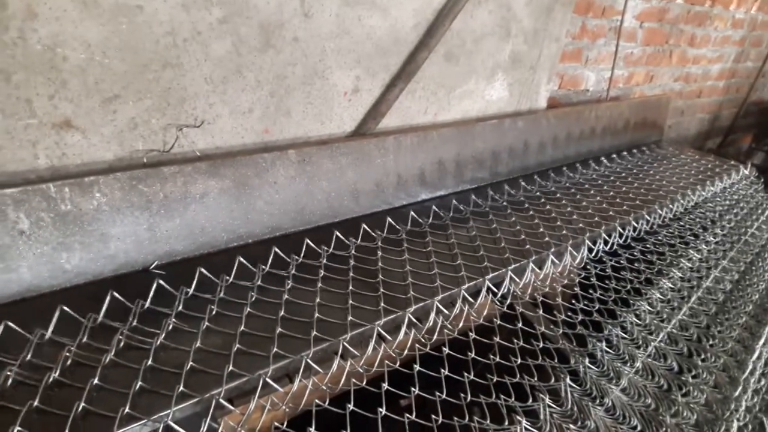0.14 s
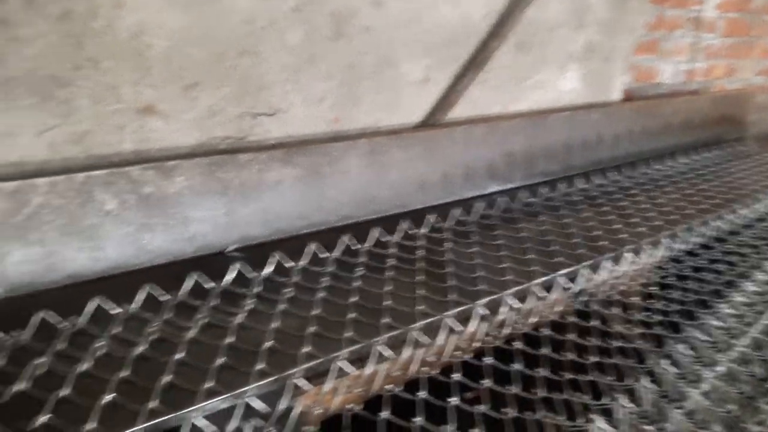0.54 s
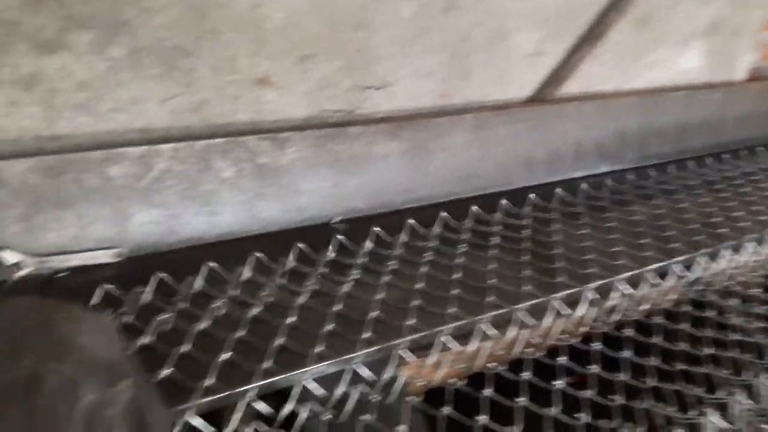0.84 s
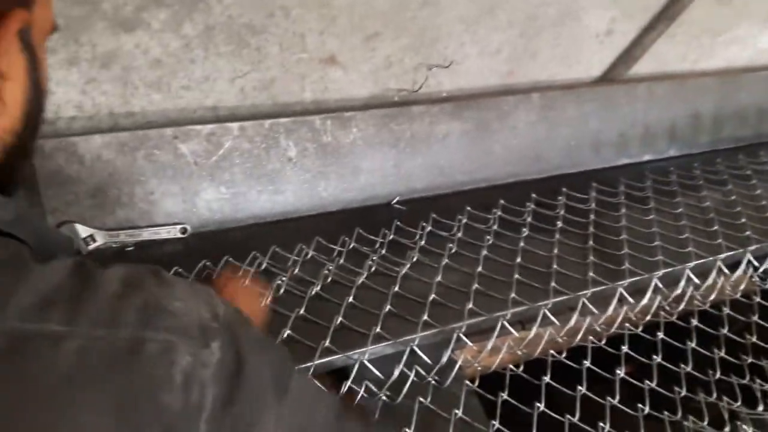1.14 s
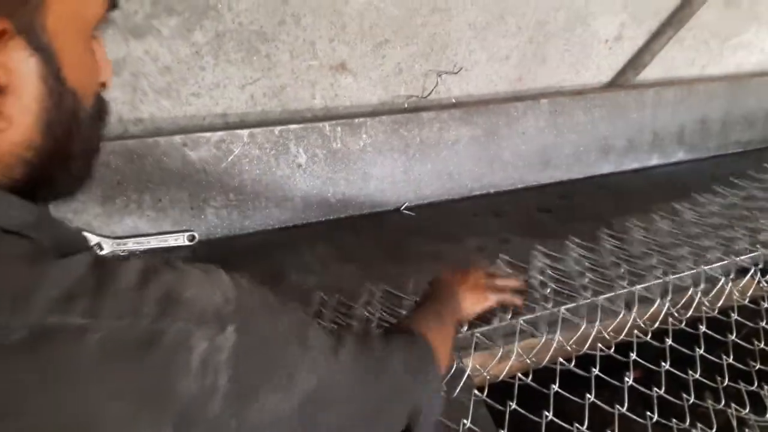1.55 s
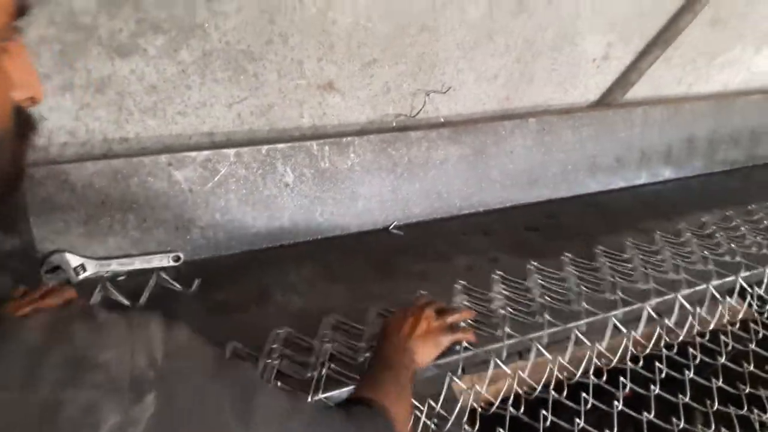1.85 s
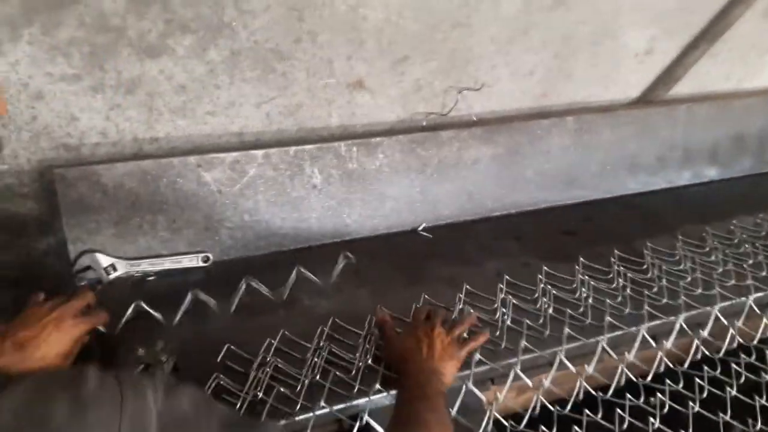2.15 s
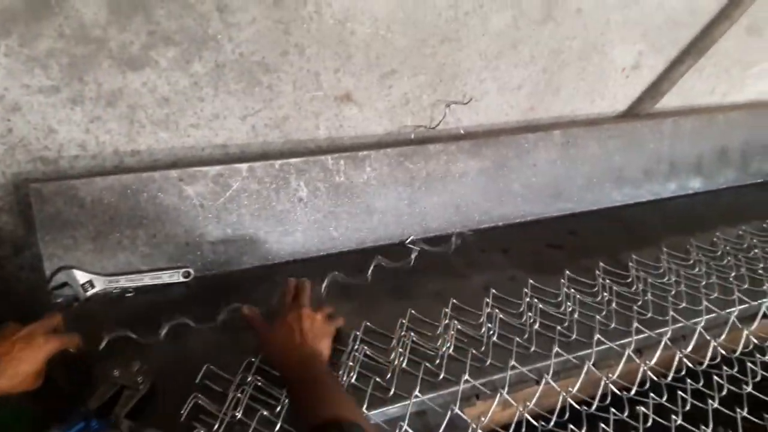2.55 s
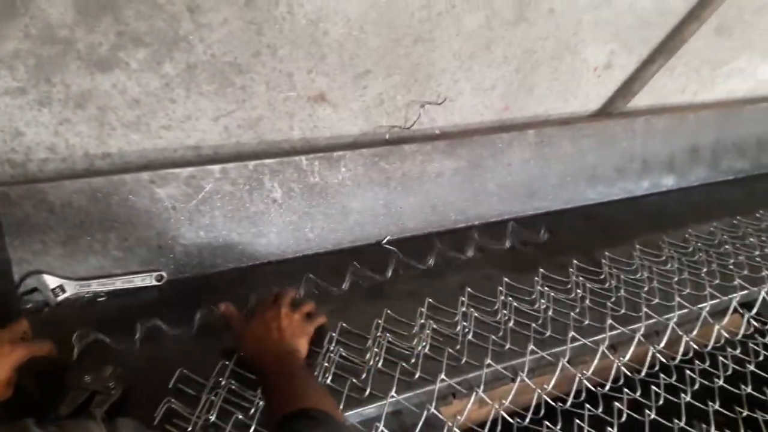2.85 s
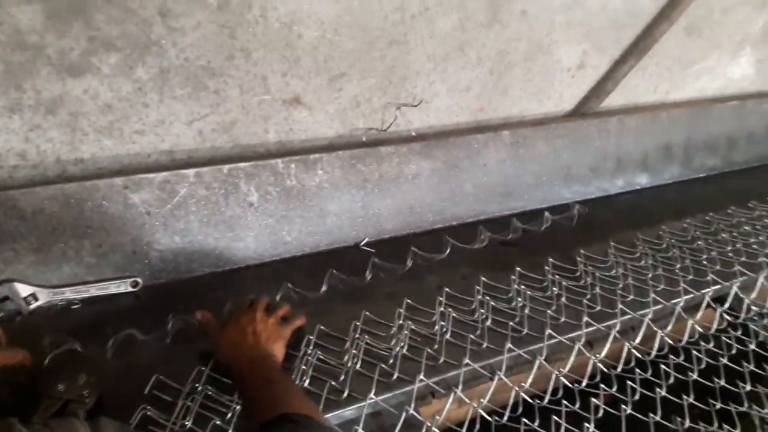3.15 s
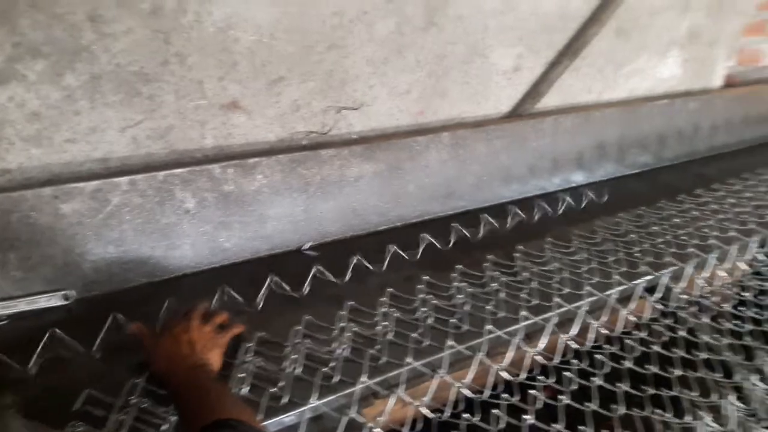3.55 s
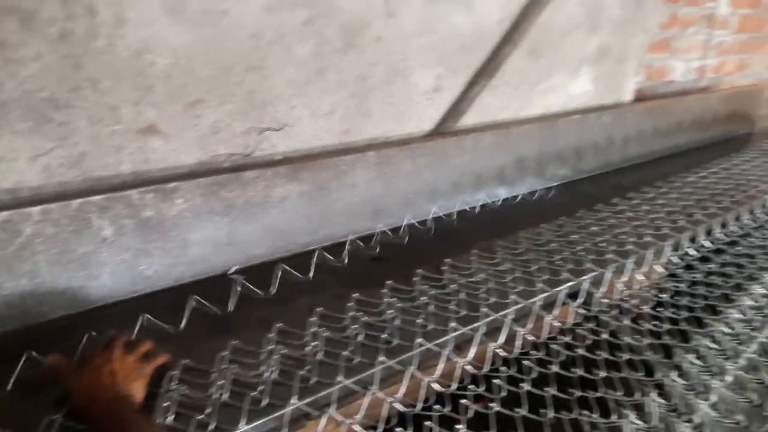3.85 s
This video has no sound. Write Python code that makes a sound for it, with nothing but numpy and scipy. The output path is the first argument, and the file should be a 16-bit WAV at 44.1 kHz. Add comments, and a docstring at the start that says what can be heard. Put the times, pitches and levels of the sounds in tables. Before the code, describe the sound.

Chain-link weaving machine winds down, quiet clinks and dragged mesh, then harsh rapid rattling pulses build

```python
"""Wire-weaving machine

A wire-weaving machine in a hard-walled workshop, close to the microphone: it runs down, a hand jolts and drags
the mesh, then it starts again. The turning wire spiral slaps a sheet-metal trough, each slap a shower of tiny ticks;
links rattle in between, a steel part clinks once, decaying noise bands make knocks and one bright ping, and filtered
noise rumbles as the drive. Ticks ring trough and wire; the microphone rings near 8 kHz and overloads."""
import sys
import numpy as np
from scipy import signal
from scipy.fft import rfft, irfft
from scipy.io import wavfile
from scipy.ndimage import uniform_filter1d

SR = 44100
rng = np.random.default_rng(int(sys.argv[2]) if len(sys.argv) > 2 else 0)


def unload_audio(sound):
    """Save the sound as a 16-bit wav file, at the path given as the first command line argument."""
    columns = np.transpose(np.atleast_2d(sound))
    # keep every value between -1 and 1, then stretch to whole-number steps
    steps = np.round(np.clip(columns, -1, 1) * 32767)
    wavfile.write(sys.argv[1], SR, steps.astype(np.int16))


N = 176400
T = np.arange(N) / SR

# ticks of slaps and clink: mean rate, scale of the exponential spread
TICKS_PER_S, TICK_SPREAD_DB = 12000, 3.5


def undb(db):
    """Decibels to amplitude ratio."""
    return 10 ** (np.asarray(db) / 20)


def unit(x):
    """Scale to an RMS of 1."""
    return x / np.sqrt(np.mean(x ** 2))


def colour(x, table, size=8192):
    """Minimum-phase filter through (Hz, dB) points; keeps the power of white input."""
    hz, db = np.array(table).T
    bin_hz = np.maximum(np.arange(size // 2 + 1), 1) * SR / size
    log_gain = np.interp(np.log(bin_hz), np.log(hz), db) * np.log(10) / 20
    # fold the cepstrum onto positive time to make the filter causal
    cepstrum = irfft(log_gain)
    cepstrum[1:size // 2] *= 2
    cepstrum[size // 2 + 1:] = 0
    impulse = irfft(np.exp(rfft(cepstrum)))
    return signal.fftconvolve(x, impulse / np.sqrt(np.sum(impulse ** 2)))[:N]


def butter(x, hz, kind, order=2):
    """Butterworth filter."""
    return signal.sosfilt(signal.butter(order, hz, kind, fs=SR, output="sos"), x)


def noise_band(low_hz, high_hz, order=2):
    """Band of white noise, RMS 1."""
    return unit(butter(rng.standard_normal(N), [low_hz, high_hz], "band", order))


def walk(rate_hz):
    """Slewed random levels, one new target every 1 / rate_hz seconds; RMS 1."""
    hold = int(SR / rate_hz)
    steps = np.repeat(rng.standard_normal(N // hold + 1), hold)
    return unit(uniform_filter1d(steps, hold)[:N])


def ticks(per_s, spread_db):
    """Random one-sample ticks of either sign, a few much larger than the rest; RMS 1."""
    when, sign, size = rng.random((3, N))
    level_db = -spread_db * np.log(size + 3e-3)
    return unit((when < per_s / SR) * np.sign(sign - .5) * undb(level_db))


def ring(x, modes, swell_db=0):
    """Decaying modes (Hz, dB, t60 s) driven by x, each with its own changing strength."""
    swells_per_s = 30
    t = T[:SR // 2]
    out = np.zeros(N)
    for hz, db, t60_s in modes:
        drive = x * unit(undb(swell_db * walk(swells_per_s)))
        mode = undb(db) * np.cos(2 * np.pi * hz * t) * 1000. ** (-t / t60_s)
        out += signal.fftconvolve(drive, mode)[:N]
    return out


def control(column):
    """Gain over time from one dB column of the machine table."""
    # Machine and moving mesh. Each row: time in seconds, rattle of links in dB,
    # brightness of the rattle in dB, low rumble of the drive in dB.
    machine = np.array([(0, -10, -6.5, -27.5), (.1, -15.5, -9, -28.5), (.25, -20.5, -4.5, -32.5),
                        (.45, -26, -15, -39), (.77, -39.5, -18, -42.5), (.8, -25, -3, -35),
                        (1.1, -28, -31, -40), (1.43, -30.5, -34, -34.5), (1.54, -12, -25, -27.5),
                        (1.8, -15, -38, -28.5), (1.95, -11, -21, -25.5), (2.2, -9, -19, -26),
                        (2.45, -12, -15, -24), (2.7, -14, -15, -28), (3.42, -13, -6.5, -28),
                        (4, -15.5, -6, -23.5)])
    return undb(np.interp(T, machine[:, 0], machine[:, column]))


def shop_noise():
    """Steady coloured noise of the workshop."""
    # Spectrum of the shop. Each row: frequency in Hz, gain in dB.
    shop_points = [(30, -22), (400, -10.5), (700, -9.5), (1300, -19.5), (7700, -23), (10000, -48),
                   (15500, -72)]
    level_db = -41.5
    return unit(colour(rng.standard_normal(N), shop_points)) * undb(level_db)


def drone():
    """Low resonances, as noise bands that fade in and out."""
    # Each row: frequency in Hz, level in dB, start in s, end in s; silent if the end is well before the start.
    drone_rows = [(207, -33, 0.19, 0.12), (358, -43, 0.12, 0.68), (680, -40.5, 0.15, 0.53),
                  (140, -38, 1.4, 2.6), (251, -31.5, 1.53, 2.48), (794, -31.5, 1.51, 2.4)]
    fade_s, q = 0.05, 9
    out = np.zeros(N)
    for hz, db, start, end in drone_rows:
        band = noise_band(hz * (1 - .5 / q), hz * (1 + .5 / q), order=1)
        gate = np.clip(np.minimum(T - start, end - T) / fade_s + .5, 0, 1)
        out += undb(db) * band * gate
    return out


def rumble():
    """Unsteady low noise of the drive through the frame, plus its droning resonances."""
    # Spectrum of the rumble. Each row: frequency in Hz, gain in dB.
    rumble_points = [(30, -19), (80, -13), (150, 0.5), (330, -5), (480, -5.5), (800, -7.5), (1500, -10.5),
                     (4000, -25)]
    flicker_db, flickers_per_s = 1.5, 11
    noise = unit(colour(rng.standard_normal(N), rumble_points))
    return noise * control(column=3) * undb(flicker_db * walk(flickers_per_s)) + drone()


def room(x):
    """Dense noise tail of a hard room; above the lowest band it dies sooner."""
    # Decay by band, low to high. Each row: upper edge in Hz, t60 in seconds.
    decay_rows = [(3000, 1.48), (10500, 0.54), (20000, 0.59)]
    level_db, gap_s = -9, .01
    t = T[:2 * SR]
    spectrum = rfft(rng.standard_normal(len(t)))
    hz = np.fft.rfftfreq(len(t), 1 / SR)
    tail = np.zeros(len(t))
    low_hz = 0
    for high_hz, t60_s in decay_rows:
        band = irfft(spectrum * (hz >= low_hz) * (hz < high_hz))
        tail += band * 1000. ** (-t / t60_s) * (t > gap_s)
        low_hz = high_hz
    return undb(level_db) * signal.fftconvolve(x, tail / np.sqrt(np.sum(tail ** 2)))[:N]


def knocks_and_ping():
    """Knocks and one bright ping: decaying bursts of one noise band each."""
    # Each row: start in seconds, level before the decay in dB, centre in Hz, width in octaves, t60 in seconds.
    burst_rows = [(0.79, -35, 420, 1.2, 0.33), (0.938, -17.5, 3830, 0.37, 0.025),
                  (1.1473, -26.5, 550, 2.07, 0.51), (1.281, -29.5, 318, 1.14, 0.63),
                  (3.859, -23.5, 154.4, 0.23, 0.88)]
    rise_s = .0006
    out = np.zeros(N)
    for start, db, hz, octaves, t60_s in burst_rows:
        t = np.maximum(T - start, 0)
        band = noise_band(hz * 2 ** (-.5 * octaves), hz * 2 ** (.5 * octaves))
        out += band * undb(db) * (1 - np.exp(-t / rise_s)) * 1000. ** (-t / t60_s)
    return out


def clink():
    """Steel on steel: a sharp contact and a brief chatter of ticks ring a loose part."""
    # Modes of the part. Each row: frequency in Hz, level in dB, t60 in seconds.
    clink_modes = [(1540, -37, 0.01), (3100, -32, 0.0029), (4230, -38, 0.0033), (5020, -48, .04)]
    start_s, chatter_fall_s = 1.2672, 0.031
    env = (T > start_s) * np.exp(-np.abs(T - start_s) / chatter_fall_s)
    return ring(ticks(TICKS_PER_S, TICK_SPREAD_DB) * env, clink_modes)


def rattle():
    """Links chatter against each other as the mesh moves; duller than slaps, dullest when dragged by hand."""
    per_s, spread_db, top_hz, bright_hz = 7000, 2.5, 10300, 5150
    flicker_db, flickers_per_s = 2, 60
    chatter = butter(ticks(per_s, spread_db), top_hz, "low")
    low = butter(chatter, bright_hz, "low")
    high = butter(chatter, bright_hz, "high")
    # minus sign: second-order halves are in antiphase at the crossover
    shaded = low - high * control(column=2)
    return shaded * control(column=1) * undb(flicker_db * walk(flickers_per_s))


def slaps():
    """Each slap: a first contact, then a shower of ticks in uneven bounces that thins out, body before treble."""
    # Slaps of wire on the trough and jolts of the mesh.
    # Each row: start in seconds, level in dB before the common gain, hold of the shower in seconds.
    slap_rows = [(0.017, 1.5, 0.073), (0.069, 0, 0.017), (0.147, -5, 0.022), (0.18, -5.5, 0.023),
                 (0.7864, -15, 0.014), (0.822, -15, 0.017), (0.8714, -16.5, 0.013), (0.923, -14.5, 0.02),
                 (1.041, -16, 0.043), (1.1476, -16.5, 0.039), (1.269, -21, 0.038), (1.448, -19.5, 0.015),
                 (1.471, -17.5, 0.042), (1.5264, -14, 0.02), (1.5716, -9, 0.033), (1.8203, -7.5, 0.026),
                 (1.931, -5, 0.0058), (1.9637, 2.5, 0.025), (2.089, 4.5, 0.024), (2.1392, -0.5, 0.022),
                 (2.1966, 2.5, 0.025), (2.23, 4.5, 0.012), (2.2618, 5.5, 0.018), (2.33, -3.5, 0.02),
                 (2.384, 0, 0.017), (2.4895, 0, 0.03), (2.6208, 5.5, 0.011), (2.739, 7, 0.013),
                 (2.792, -1.5, 0.039), (2.8543, 8, 0.028), (2.919, -5, 0.012), (2.9852, 9, 0.02),
                 (3.0486, -1, 0.0057), (3.104, 6, 0.0087), (3.1628, 6, 0.012), (3.2235, 8, 0.025),
                 (3.288, 4, 0.025), (3.342, -3, 0.011), (3.354, 10, 0.011), (3.399, -1, 0.049),
                 (3.4655, -2, 0.0088), (3.491, 7.5, 0.0081), (3.565, -6.5, 0.03), (3.611, 3, 0.03),
                 (3.666, 0, 0.022), (3.7323, 6, 0.016), (3.799, 1, 0.011), (3.849, 3.5, 0.036),
                 (3.913, 2, 0.026), (3.9823, 7.5, 0.017)]
    common_gain_db, rise_s, sag_db_per_s = -11.5, 0.00097, -220
    crack_db, crack_fall_s = 5, .004  # first contact stands out
    bounce_db, bounces_per_s = 1.5, 150
    treble_hz, treble_db_per_db = 11300, 0.1  # harder slaps are brighter
    # rows: body, treble; time constants after the hold, and share of the hold
    fall_s = np.array([[0.02], [0.041]])
    hold_share = np.array([[1], [0.66]])

    power = np.zeros((2, N))
    for start, db, hold_s in slap_rows:
        i = int(start * SR)
        t = T[i:i + SR // 4] - start
        env = np.clip(t / rise_s, 0, 1) * np.exp(-np.maximum(t - hold_share * hold_s, 0) / fall_s)
        crack = crack_db * np.exp(-np.maximum(t, 0) / crack_fall_s)
        env = env * undb(crack + sag_db_per_s * t)
        level = undb([[db], [db * (1 + treble_db_per_db)]])
        power[:, i:i + len(t)] += (env * level) ** 2  # overlapping slaps add in power

    shower = ticks(TICKS_PER_S, TICK_SPREAD_DB) * unit(undb(bounce_db * walk(bounces_per_s)))
    treble = butter(shower, treble_hz, "high")
    body = shower - treble
    return undb(common_gain_db) * (body * np.sqrt(power[0]) + treble * np.sqrt(power[1]))


def metal(x):
    """Ticks ring the modes of trough and wire and reach the microphone."""
    # Modes of trough and wire. Each row: frequency in Hz, level in dB, t60 in seconds.
    trough_modes = [(1147, -52, 0.26), (3075, -40, 0.031), (4200, -41, 0.024), (4940, -41.5, 0.029)]
    # Ticks as the microphone hears them. Each row: frequency in Hz, gain in dB.
    tick_points = [(100, -26), (500, -15), (1300, -11), (2700, -6.5), (4000, -3), (5600, -2.5), (6800, 3),
                   (7900, 8.5), (9000, 3), (10800, -5.5), (15500, -14)]
    wire_db, wire_t60_s = -39, 0.0058
    wire_modes = [(hz, wire_db, wire_t60_s) for hz in np.linspace(7270, 8270, num=5)]
    # swell: the mix of modes keeps changing
    return colour(x + ring(x, [*trough_modes, *wire_modes], swell_db=3), tick_points)


def scene():
    """Near sources with their room tail, over rumble and shop noise."""
    near = metal(slaps() + rattle()) + knocks_and_ping() + clink()
    return (near + room(near) + rumble() + shop_noise())[None]


def record(dry):
    """The input clips, then a steep low-pass cuts the top."""
    overload, top_hz = .92, 15700
    cut = signal.ellip(14, .2, 78, top_hz, fs=SR, output="sos")  # ripple dB, stopband dB
    return signal.sosfilt(cut, np.clip(dry, -overload, overload))


dry = scene()
out = record(dry)
unload_audio(out)
```